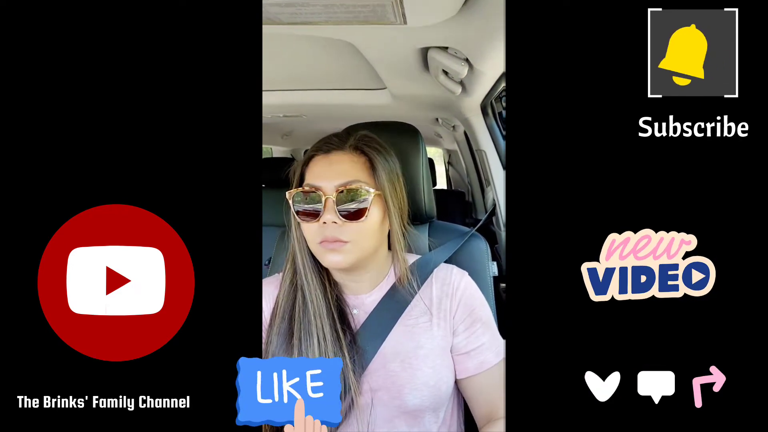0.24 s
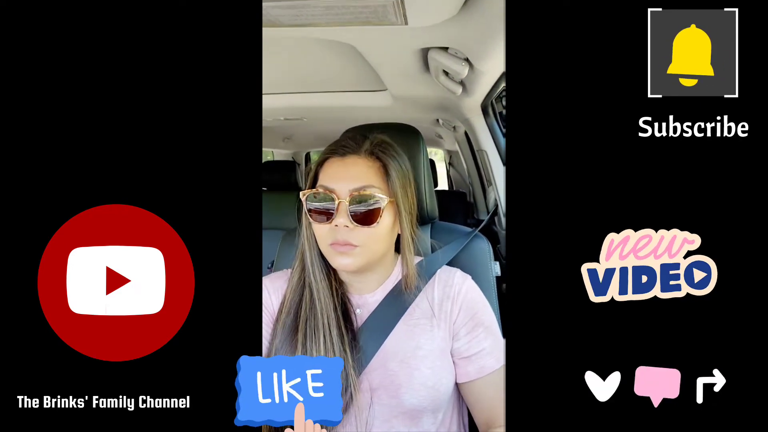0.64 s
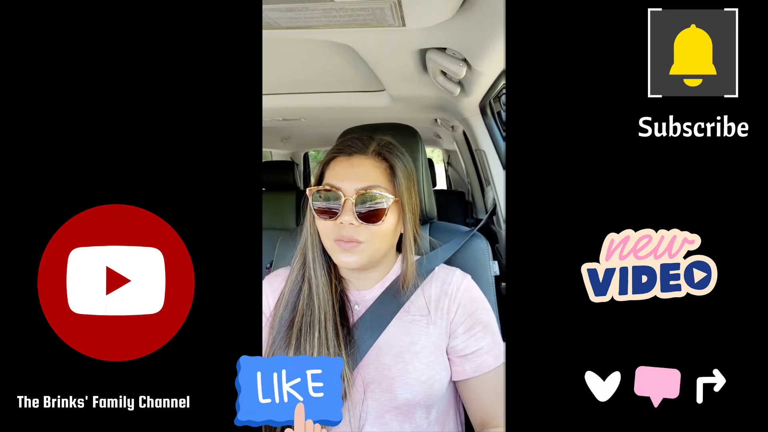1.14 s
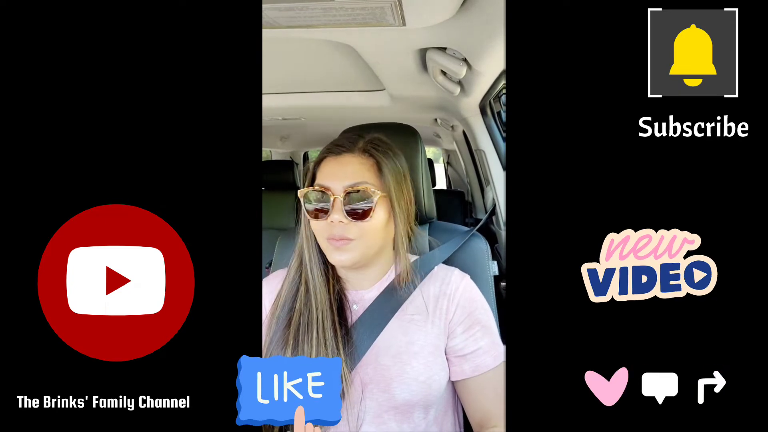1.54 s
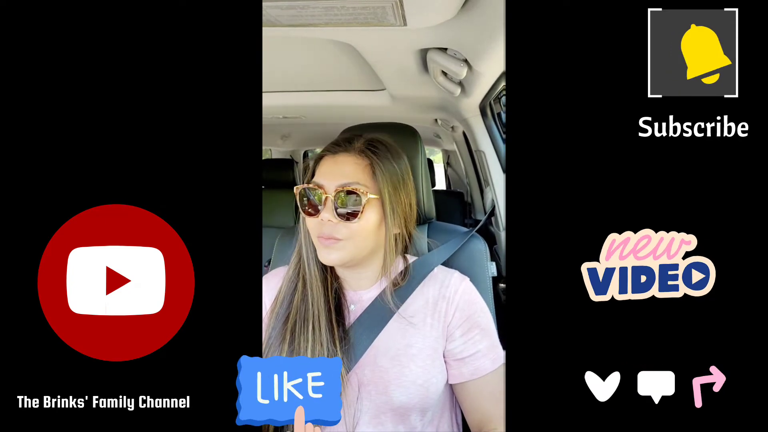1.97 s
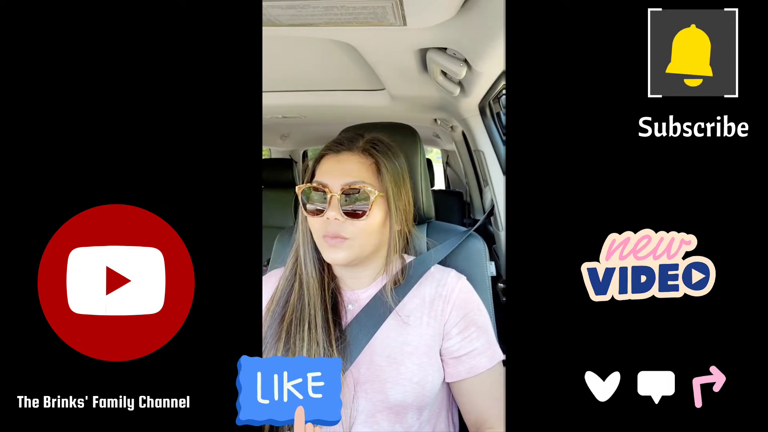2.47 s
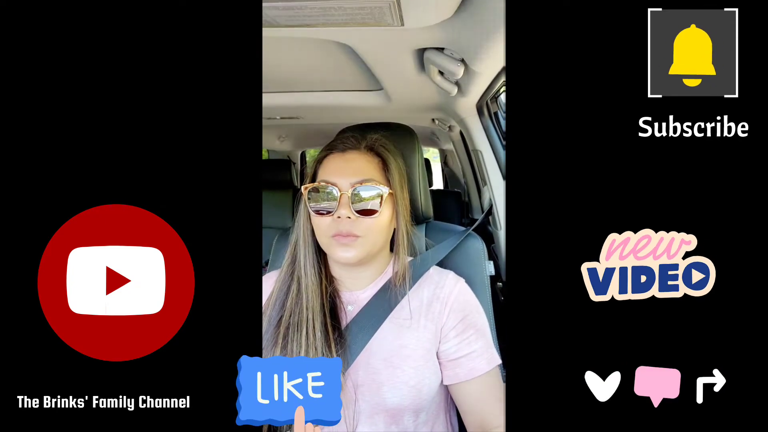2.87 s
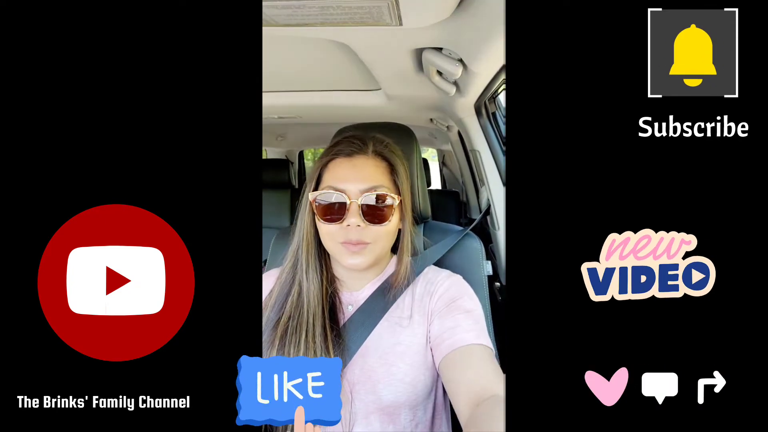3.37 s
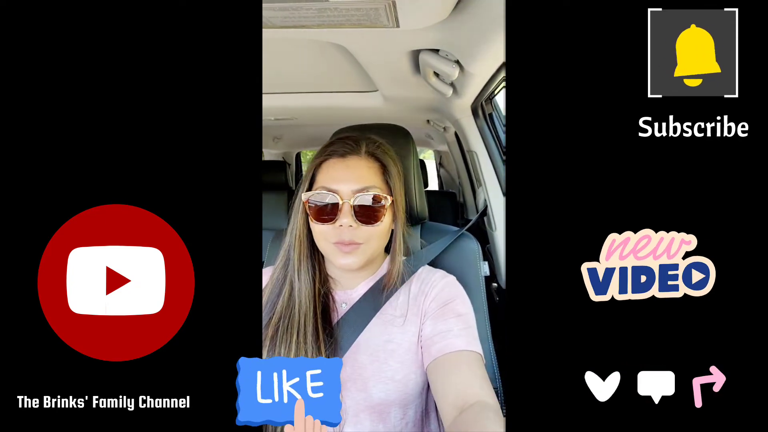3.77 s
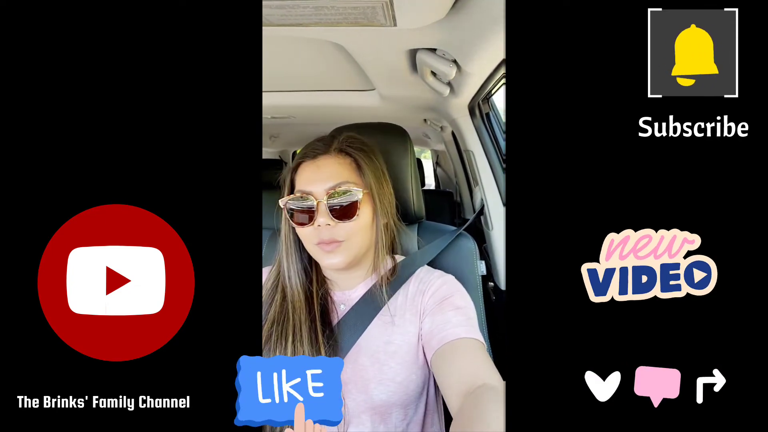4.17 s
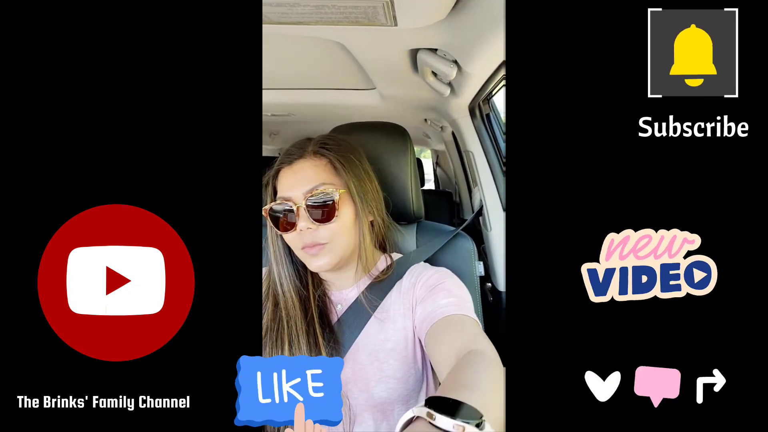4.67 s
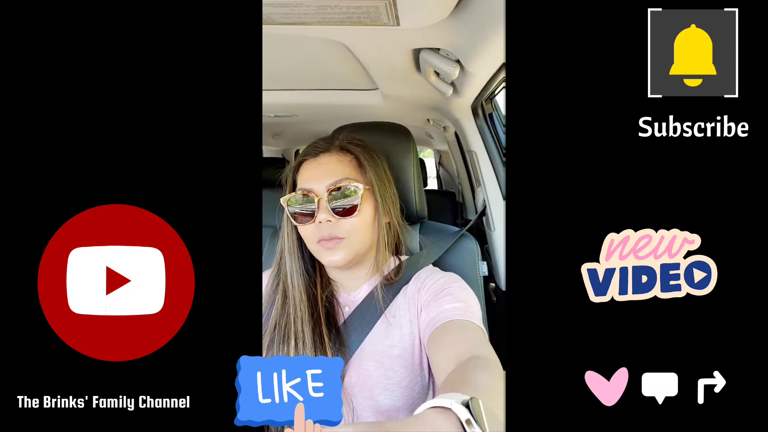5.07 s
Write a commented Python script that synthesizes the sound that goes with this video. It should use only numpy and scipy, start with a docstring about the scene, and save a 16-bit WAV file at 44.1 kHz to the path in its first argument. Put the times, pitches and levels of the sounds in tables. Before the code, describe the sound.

Inside a closed car cabin on the move, picked up by a phone near the driver. A low engine hum pulls gently from the start, beneath continuous bassy tyre rumble, muffled road roar, soft hiss and wavering panel hum. A low thump opens the scene. Between about 0.3 and 0.7 s the plastic phone holder snaps and knocks, close and sharp on the right, strongest near 0.5 and 0.7 s, while a bump thuds around 0.55 s. Cloth slides very faintly until about 1.2 s. Softer thumps continue around 1.4, 2.6 and 3.0 to 3.3 s. Loose trim gives small dry double ticks, leaning left, around 1.8, 2.3, 3.5, 4.8 and 5.3 s. From about 3.9 s the engine eases into coasting. At roughly 4.1 s ribbed paving raises a strong, pulsing deep drone, surging until about 4.5 s, then weakening towards the end.

```python
"""Inside a car cruising along a road, heard from a phone near the driver: engine orders (sine sums) pull, then coast.
Tyre rumble, roar and hiss are shaped noise, panels hum in narrow bands; low thumps ring damped cabin modes.
The phone's plastic holder snaps (noise bursts) and knocks (damped sines); cloth slides softly (noise).
Loose trim ticks now and then (damped modes plus rattle); late on, ribbed paving drones (harmonics of the rib rate)."""
import sys
import numpy as np
from scipy import signal
from scipy.fft import rfft, irfft, next_fast_len
from scipy.io import wavfile
from scipy.ndimage import map_coordinates

SR = 44100
rng = np.random.default_rng(int(sys.argv[2]) if len(sys.argv) > 2 else 0)


def wav_out(sig):
    """Save sig, one row per channel (or a flat mono array), as 16-bit PCM at SR to the path in sys.argv[1]."""
    wavfile.write(sys.argv[1], SR, np.round(np.clip(np.atleast_2d(sig).T, -1, 1) * 32767).astype(np.int16))


N = 234389


def amp(db):
    """Decibels to gain."""
    return 10 ** (np.asarray(db) / 20)


def unit(x):
    """Scale to rms 1."""
    return x / np.sqrt(np.mean(x ** 2) + 1e-20)


def along(points, hz):
    """Interpolate (f/Hz, value) points on a log-frequency axis."""
    f, v = np.transpose(points)
    return np.interp(np.log(hz + 1), np.log(f + 1), v)


def curves(rows):
    """One value per sample for each column after the time."""
    s, *cols = np.transpose(rows)
    return [np.interp(np.arange(N) / SR, s, c) for c in cols]


def wobble(rate_hz):
    """Smooth random curve, rate_hz knots a second."""
    knots = rng.standard_normal(int(N * rate_hz / SR) + 4)
    return map_coordinates(knots, [np.arange(N) * rate_hz / SR])


def filtered(x, response):
    """Multiply the spectrum of x by a response of frequency."""
    n = x.shape[-1]
    m = next_fast_len(n + 8192)  # zero padding limits wrap-around
    return irfft(rfft(x, m) * response(np.fft.rfftfreq(m, 1 / SR)), m)[..., :n]


def sides(lean_db):
    """Left and right gains for a left-minus-right level difference."""
    return amp(np.array([[.5], [-.5]]) * lean_db)


def add(track, s, sound):
    """Mix a sound into a track at time s."""
    part = track[..., max(round(s * SR), 0):][..., :sound.shape[-1]]
    part += sound[..., :part.shape[-1]]


def swell(start_s, length_s, attack_s, release_s):
    """Envelope: a linear rise from start_s times a linear fall that begins length_s later."""
    t = np.arange(N) / SR - start_s
    return np.clip(t / attack_s, 0, 1) * np.clip(1 - (t - length_s) / release_s, 0, 1)


def ringing(modes, t):
    """Damped sines from rows of (f/Hz, level/dB, t60/s)."""
    return sum(amp(db - 60 * t / t60) * np.sin(2 * np.pi * hz * t) for hz, db, t60 in modes)


# left-right likeness of cabin noise: f/Hz, correlation
ALIKE = [(60, 0.97), (120, 0.96), (240, 0.93), (470, 0.5), (940, -0.02), (1880, -0.24), (3750, 0.18),
         (7470, -0.31), (14900, 0.016)]
# stereo lean of cabin noise: f/Hz, left minus right/dB
LEAN = [(60, 0), (110, -2.5), (200, 0), (380, -2), (700, -2), (1280, -6), (2370, -6.5), (4370, 7.5),
        (8060, 3), (14900, 3)]


def rush(spectrum):
    """Cabin noise of rms 1: alike at both microphones in the bass, largely unrelated higher up."""
    def mid_side_gains(hz):
        turn = np.arccos(np.clip(along(ALIKE, hz), -1, 1)) / 2
        return amp(along(spectrum, hz)) * [np.cos(turn), np.sin(turn)]

    mid, side = filtered(rng.standard_normal((2, N)), mid_side_gains)
    pair = np.array([mid + side, mid - side])
    return unit(filtered(pair, lambda hz: sides(along(LEAN, hz))))


# engine cycle before the coasting drop: t/s, f/Hz
ENGINE = [(0.0, 49.56), (0.2, 50.2), (0.63, 51.67), (1.87, 54.55), (2.33, 52.49), (3.0, 53.91),
          (3.49, 53.83), (3.69, 54.9), (4.0, 53.63)]
# orders 1 to 6 of the engine cycle: relative level/dB
ORDERS_DB = [2.5, -4, 1.5, 3, -11, -17.5]
# cabin resonances that lift a passing order: f/Hz, half width/Hz, lift/dB
BOOMS = [(102.9, 2.5, 9.5), (305.2, 11, 13)]
HUM_DB, LOAD_DB = -46, 4  # coasting level; what the throttle adds
THROTTLE_S, THROTTLE_HOLD_S = 0.05, 3.85  # foot goes down; stays down
COAST_DROP_HZ = 5  # fall of the cycle once the foot lifts


def engine(waver_db=1.86, jitter_rad=0.2, press_s=0.38, lift_s=0.25, first_order_load=0.24):
    """Low engine orders: each wavers, grows under throttle and booms near a cabin resonance."""
    coasting = np.clip((np.arange(N) / SR - THROTTLE_S - THROTTLE_HOLD_S) / lift_s, 0, 1)
    cycle_hz = curves(ENGINE)[0] - COAST_DROP_HZ * coasting
    phase = 2 * np.pi * np.cumsum(cycle_hz) / SR
    load_db = LOAD_DB * (swell(THROTTLE_S, THROTTLE_HOLD_S, press_s, lift_s) - 1)  # 0 at full throttle
    hum = 0
    for k, order_db in enumerate(ORDERS_DB, 1):
        boom_db = sum(db / (1 + ((k * cycle_hz - centre) / width) ** 2) for centre, width, db in BOOMS)
        load_share = first_order_load if k == 1 else 1
        level_db = order_db + boom_db + load_db * load_share + waver_db * wobble(4)
        hum = hum + amp(level_db) * np.sin(k * phase + rng.uniform(0, 2 * np.pi) + jitter_rad * wobble(12))
    return np.sqrt(2) * amp(HUM_DB + LOAD_DB) * hum * sides(-.4)


# coarseness of the asphalt, swing about the mean: t/s, level/dB
ROAD = [(0.0, -56), (1.51, -58), (1.71, -55.5), (4.42, -53.5), (4.61, -55.5), (5.31, -58)]
# uneven stretches that shake the suspension: start/s, length/s, rumble change/dB
UNEVEN = [(0.414, 0.26, 6.5), (2.102, 0.21, 2), (2.579, 0.13, -4), (2.949, 0.17, 3.5), (4.543, 0.22, 5.5)]
# noise spectra, relative: f/Hz, level/dB per Hz
RUMBLE = [(12, -29.5), (19, -16.5), (26, -6.5), (34, -1.5), (45, 6), (60, 0.5), (80, 1.5), (120, -9.5),
          (170, -8.5), (300, -83)]
ROAR = [(60, -29.5), (110, 1.5), (150, -2.5), (195, 1.5), (250, -2), (300, -5), (350, -13), (420, -17.5),
        (600, -36), (1200, -83.5)]
HISS = [(200, -31.5), (420, 0.5), (620, 4), (850, -3), (1150, -8), (1450, -7.5), (2000, -15), (2600, -25),
        (3600, -32), (5000, -42), (7500, -60), (15000, -56)]


def road(rumble_db=-33.5, roar_db=-38.5, hiss_db=-55, roar_follows=0.92, hiss_follows=0.9,
         rib_roar_db=2, rib_hiss_db=1.5, texture_db=1.33, lumps_db=1.0, shake_rise_s=0.18, shake_fall_s=0.056):
    """Road shakes the suspension, tread hisses through the glass; coarse asphalt and ribs raise roar and hiss."""
    coarse_db, = curves(ROAD)
    coarse_db = coarse_db - coarse_db.mean()
    on_ribs = paving()
    on_ribs = on_ribs / on_ribs.max()
    shake_db = sum(db * swell(s, length, shake_rise_s, shake_fall_s) for s, length, db in UNEVEN)
    surface_db = texture_db * wobble(9)  # patches of coarser and finer asphalt
    rumble = amp(rumble_db + shake_db + lumps_db * wobble(7)) * rush(RUMBLE)
    roar = amp(roar_db + roar_follows * coarse_db + rib_roar_db * on_ribs + surface_db) * rush(ROAR)
    hiss = amp(hiss_db + hiss_follows * coarse_db + rib_hiss_db * on_ribs + surface_db) * rush(HISS)
    return rumble + roar + hiss


# panels that the road sets humming: f/Hz, width/Hz, level/dB
PANELS = [(162.2, 8, -47.5), (212, 9.8, -47.5), (264.3, 10, -51), (344.2, 6, -60.5)]


def panels(surge_db=3.5, drift_hz=4):
    """Each panel hums in a narrow band that surges and drifts at random."""
    t = np.arange(N) / SR
    hum = 0
    for hz, width, db in PANELS:
        surge = amp(surge_db * wobble(3))
        band = wobble(2 * width) + 1j * wobble(2 * width)
        carrier = np.exp(2j * np.pi * (hz * t + drift_hz * np.cumsum(wobble(2.5)) / SR))
        hum = hum + amp(db) * unit(surge * np.real(band * carrier))
    return hum * sides(-.6)


# low thumps and brief peaks in the road noise: t/s, level/dB, pitch f/Hz
THUMPS = [(0.002, -16, 44.16), (0.479, -21, 154.4), (0.557, -11.5, 57.5), (0.588, -17, 96.8),
          (0.645, -23.5, 50.6), (0.675, -21, 99), (1.045, -24, 108), (1.388, -22.5, 44.76),
          (2.604, -20.5, 164.5), (3.034, -21, 44.74), (3.135, -19, 43.7), (3.265, -23, 197.7),
          (4.127, -25.5, 98.9), (4.352, -21.5, 159.8)]
# cabin boom modes: f/Hz, level/dB, t60/s
BODY = [(41.2, 4.5, 0.13), (59.5, -2.5, 0.12), (84, -3.5, 0.1), (112.7, -2, 0.23), (160.3, 1.5, 0.15),
        (232, -0.5, 0.16)]


def thumps(attack_s=0.0067, focus_db=16):
    """Each thump rings the cabin's low modes, most those near its own pitch."""
    out, t = np.zeros(N), np.arange(SR // 2) / SR
    for s, thump_db, thump_hz in THUMPS:
        modes = [(hz, db - focus_db * np.log2(hz / thump_hz) ** 2, t60) for hz, db, t60 in BODY]
        add(out, s, amp(thump_db) * ringing(modes, t) * (1 - np.exp(-t / attack_s)))
    return out


# slips of the holder: t/s, snap level/dB, brightness/dB per octave, t60/s, ring level/dB
SNAPS = [(0.282, -42.5, 1, 0.028, -58), (0.4629, -42, 0.5, 0.032, -51), (0.4823, -42, 1, 0.028, -58),
         (0.573, -59, 4.5, 0.012, -83), (0.6835, -32, 7.5, 0.011, -64), (0.685, -36, 5, 0.023, -63)]
# snap spectrum, relative: f/Hz, level/dB per Hz
SNAP = [(300, -3), (800, 11.5), (1100, -2), (2000, 0), (2900, 1), (3700, -0.5), (4700, -4.5), (6000, -10),
        (9500, -24.5), (12500, -26), (15000, -28)]
# stereo lean of the snap: f/Hz, left minus right/dB
SNAP_LEAN = [(1000, -33.5), (3300, -17.5), (4700, -2.5), (7000, 4)]
# ring of the holder: f/Hz, relative level/dB, t60/s
HOLDER = [(1382, -27, 0.056), (2160, -6, 0.033), (2940, 6, 0.056), (3460, 4.5, 0.021), (4660, -5, 0.045)]


def holder(cabin_t60_s=0.54, cabin_db=-36, snap_rise_s=0.00021, ragged_db=3,
           lead_in_db=-23, lead_in_db_per_s=1100):
    """Plastic slips with a ragged snap and rings."""
    out, t = np.zeros((2, N)), np.arange(SR // 10) / SR
    rise = 1 - np.exp(-t / snap_rise_s)
    lead_in = amp(lead_in_db - lead_in_db_per_s * t[::-1])  # faint noise rising before the snap
    for s, snap_db, tilt_db, snap_t60, ring_db in SNAPS:
        fade = rise * (amp(-60 * t / snap_t60) + amp(cabin_db - 60 * t / cabin_t60_s))

        def colour(hz):
            tilt = tilt_db * np.log2((hz + 1) / 3000)
            return amp(along(SNAP, hz) + tilt) * sides(along(SNAP_LEAN, hz))

        ragged = amp(ragged_db * wobble(1500)[:len(t)]) * rng.standard_normal((2, len(t)))
        friction = amp(snap_db) * unit(filtered(ragged, colour))
        ring = rise * amp(ring_db) * ringing(HOLDER, t) * amp([[-14], [0]])
        add(out, s - len(t) / SR, lead_in * friction)
        add(out, s, fade * friction + ring)
    return out


# holder against phone: t/s, level/dB, f/Hz, pulse decay/cycles, thud/dB, thud brightness/dB per octave
KNOCKS = [(0.2834, -31.5, 1020, 0.8, -47, 3), (0.285, -31, 1800, 0.5, -53, 6),
          (0.4866, -19, 1014, 0.41, -33, 0), (0.5743, -25, 1640, 0.35, -53, 1),
          (0.6864, -23, 1350, 1.4, -35, -0.5)]
# thud modes of the phone's case: f/Hz, relative level/dB, t60/s
CASE = [(340, 0.5, 0.035), (540, 1.5, 0.015), (786, 3.5, 0.016), (3050, -16, 0.008), (5420, -27, 0.02)]


def knocks(contact_s=0.00023, ring_db=-21, ring_t60_s=0.037, left_db=-22):
    """Holder knocks the case by the right microphone: hard pulse, woody ring at the struck spot's pitch, thud."""
    out, t = np.zeros(N), np.arange(SR // 10) / SR
    for s, knock_db, knock_hz, cycles, thud_db, tilt_db in KNOCKS:
        decay = np.exp(-knock_hz * t / cycles) + amp(ring_db - 60 * t / ring_t60_s)
        spot = np.sin(2 * np.pi * knock_hz * t) * decay
        case = ringing([(hz, db + tilt_db * np.log2(hz / CASE[0][0]), t60) for hz, db, t60 in CASE], t)
        onset = 1 - np.exp(-(t / contact_s) ** 2)
        add(out, s, (amp(knock_db) * spot + amp(thud_db) * case) * onset)
    return out * amp([[left_db], [0]])


# slides of cloth: start/s, length/s, level/dB
CLOTH = [(0.33, 0.082, -76.5), (0.729, 0.43, -79), (4.199, 0.28, -87)]
# cloth spectrum, relative: f/Hz, level/dB per Hz
WEAVE = [(1500, -30.5), (3200, 3), (4900, -2), (5600, -4), (8000, -21.5), (12000, -34.5)]


def cloth(flutter_db=2, attack_s=0.08, release_s=0.2):
    """Cloth slides softly on the seat: fluttering noise."""
    slides = sum(amp(db) * swell(s, length, attack_s, release_s) for s, length, db in CLOTH)
    return slides * amp(flutter_db * wobble(40)) * rush(WEAVE)


# trim ticks: t/s, tap level/dB, brightness/dB per octave, f/Hz of the first mode listed in TRIM
TICKS = [(1.2605, -56.5, 6, 1900), (1.7565, -47.5, 3, 1987), (1.7835, -54.5, 0, 1920),
         (2.3285, -44, -2, 1934), (2.3624, -48.5, -3, 1924), (3.5335, -45, 1.5, 2003),
         (3.5463, -48, -2, 1967), (4.2552, -62, 8, 2053), (4.377, -58, 7, 2030), (4.7682, -45.5, 0.5, 1985),
         (4.7982, -49, 1, 2010), (5.2645, -50, 1, 1980), (5.2786, -54, 2, 1950)]
# trim modes, all scaled to the tick's pitch: f/Hz, width/Hz, relative level/dB
TRIM = [(1950, 150, 11), (1450, 250, -0.5), (2550, 290, -2), (3680, 210, 2.5), (4350, 380, -6.5),
        (4900, 300, -13), (5500, 500, -16)]
# stereo lean of the trim: f/Hz, left minus right/dB
TRIM_LEAN = [(2000, -1), (2700, 0.5), (3700, 7.5), (5500, 7.5)]


def trim(chatter_t60_s=0.061, chatter_db=-10, cabin_t60_s=0.34, cabin_db=-21, rise_s=0.0017,
         rattle_db=3, rattle_grows=0.36, echo_s=0.0068):
    """Loose trim on the left taps, rings and rattles, more when hit harder; the window throws the tap back."""
    out, t = np.zeros((2, N)), np.arange(SR // 6) / SR
    onset = 1 - np.exp(-(t / rise_s) ** 2)
    fade = (amp(chatter_db - 60 * t / chatter_t60_s) + amp(cabin_db - 60 * t / cabin_t60_s)) * onset
    hardest_db = max(tick[1] for tick in TICKS)
    for s, tap_db, tilt_db, pitch_hz in TICKS:
        stretch = pitch_hz / TRIM[0][0]
        ring = 0
        for hz, width, db in TRIM:
            level = width * amp(db + tilt_db * np.log2(hz / 3000))
            ring = ring + level * np.exp(-np.pi * width * t) * np.sin(2 * np.pi * hz * stretch * t)
        noise = rng.standard_normal((2, 2 * len(t) - 1))
        chatter = unit(signal.fftconvolve(noise, ring[None], mode="valid", axes=1))
        rattle_level_db = rattle_grows * (tap_db - hardest_db) + rattle_db * wobble(350)[:len(t)]
        rattle = amp(rattle_level_db) * fade * chatter
        tap = onset * ring / np.abs(onset * ring).max()
        add(out, s, amp(tap_db) * (tap * amp([[0], [-8]]) + rattle))
        add(out, s + echo_s, amp(tap_db) * tap * amp([[-7], [-3]]))
    return filtered(out, lambda hz: sides(along(TRIM_LEAN, hz)) / (1 + (hz / 6300) ** 6))


# patches of ribbed paving: start/s, length/s, drone level/dB
RIBS = [(4.068, 0.07, -20), (4.151, 0.15, -21), (4.372, 0.047, -24.5), (4.589, 0.24, -29),
        (4.993, 0.16, -32)]
RIB_ATTACK_S, RIB_RELEASE_S = 0.045, 0.27  # tyres roll onto a patch; off it


def paving():
    """Strength of the rib drone as the tyres cross the patches."""
    return np.max([amp(db) * swell(s, length, RIB_ATTACK_S, RIB_RELEASE_S) for s, length, db in RIBS], axis=0)


# ribs passed: t/s, f/Hz
RIB_RATE = [(4.1, 58.8), (4.25, 59.6), (4.4, 61), (4.6, 59.5), (4.8, 56.5), (5.15, 56)]
# second harmonic of the drone: t/s, level/dB
RIB_SECOND = [(4.06, -69.5), (4.135, -26.5), (4.175, -34.5), (4.21, -25.5), (4.26, -42), (4.325, -38),
              (4.365, -24), (4.45, -30.5), (4.55, -38.5), (4.85, -49), (5.3, -51)]
# overtones: multiple of the rib rate, level/dB re drone at its strongest
RIB_OVERTONES = [(3, -24), (4, -34), (5, -22.5)]
# tread slap spectrum, relative: f/Hz, level/dB per Hz
RIB_SLAP = [(60, -25.5), (105, 1.5), (170, -5), (240, -11), (330, -21), (600, -32), (1400, -41),
            (3000, -70), (8000, -120)]


def ribs(jitter_rad=0.11, waver_db=0.66, second_waver_db=2.0, second_jitter_rad=0.33,
         overtone_waver_db=2, overtone_jitter_rad=0.27, slap_db=-20, slap_depth_db=6):
    """Ribs pound the tyres and the cabin drones; the second harmonic surges, the tread slaps each rib."""
    rate_hz, = curves(RIB_RATE)
    second_db, = curves(RIB_SECOND)
    strength = paving()
    phase = 2 * np.pi * np.cumsum(rate_hz) / SR

    def partial(depth_db, wander_rad, order):
        angle = order * phase + rng.uniform(0, 2 * np.pi) + wander_rad * wobble(22)
        return amp(depth_db * wobble(22)) * np.sin(angle)

    first = strength * partial(waver_db, jitter_rad, 1)
    second = amp(second_db) * partial(second_waver_db, second_jitter_rad, 2)
    overtones = sum(amp(db) * partial(overtone_waver_db, overtone_jitter_rad, round(k)) for k, db in RIB_OVERTONES)
    drone = first + second + np.sqrt(strength * strength.max()) * overtones
    slaps = amp(slap_db) * strength * unit(amp(slap_depth_db * np.cos(phase)) * rush(RIB_SLAP))
    return np.sqrt(2) * drone * sides(-1.7) + slaps


def scene(bass_turn_rad=0.23, bass_hz=85):
    """Everything in the cabin; the longest waves reach the left microphone a little later."""
    drive = engine() + road() + panels() + thumps() + ribs()

    def bass_lag(hz):
        turn = bass_turn_rad / (1 + (hz / bass_hz) ** 4)
        return np.exp(1j * turn * np.array([[-.5], [.5]]))

    return filtered(drive, bass_lag) + holder() + knocks() + cloth() + trim()


TOP_HZ = 15500


def record(dry):
    """The phone keeps nothing above its band limit."""
    return filtered(dry, lambda hz: hz < TOP_HZ)


dry = scene()
out = record(dry)
wav_out(out)
```